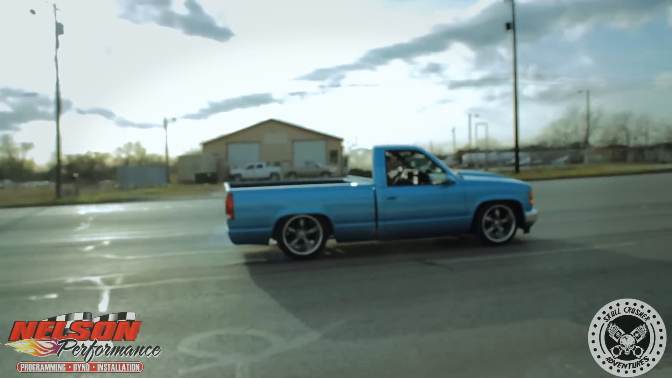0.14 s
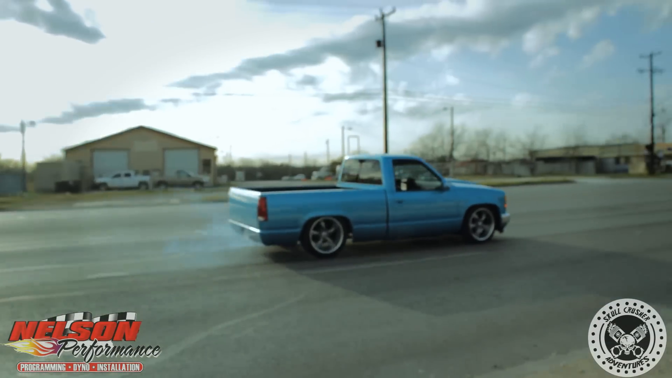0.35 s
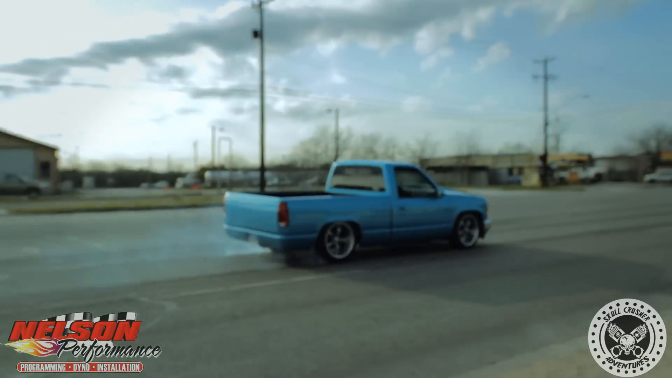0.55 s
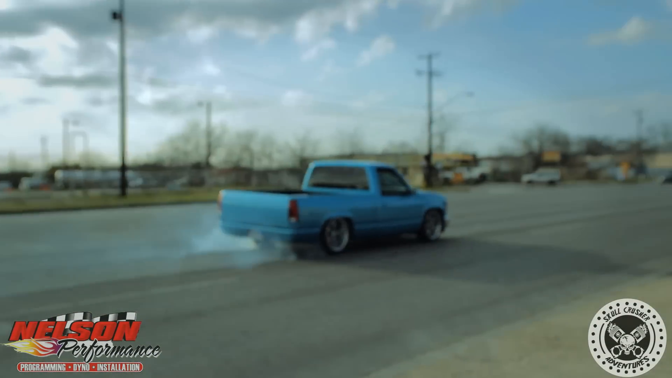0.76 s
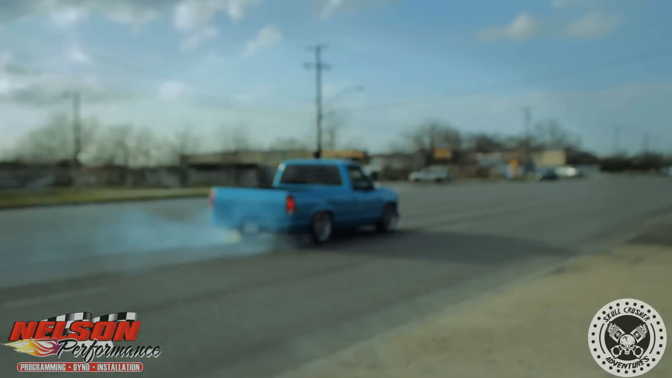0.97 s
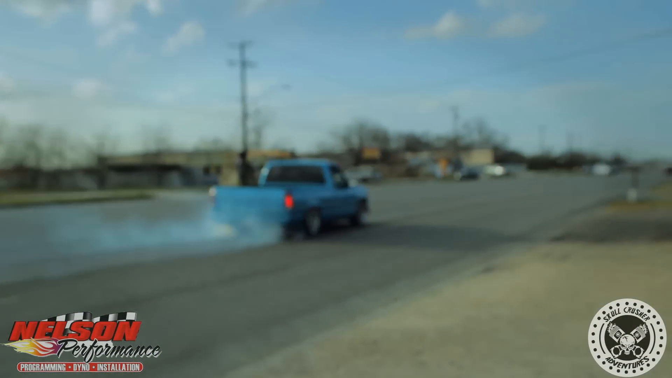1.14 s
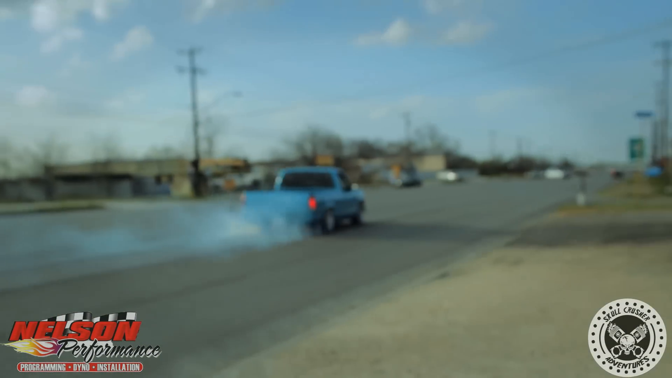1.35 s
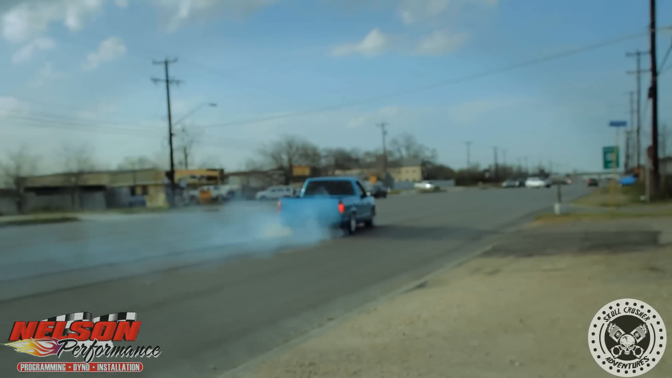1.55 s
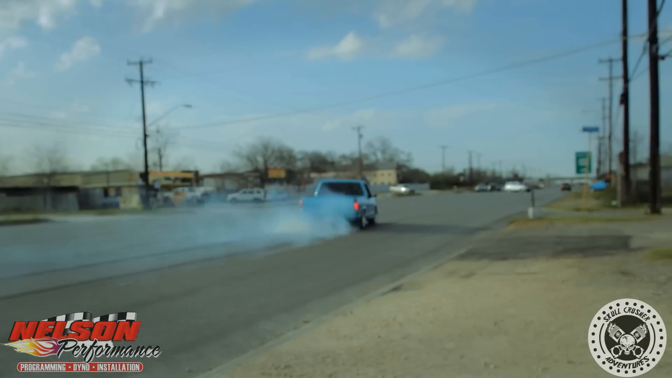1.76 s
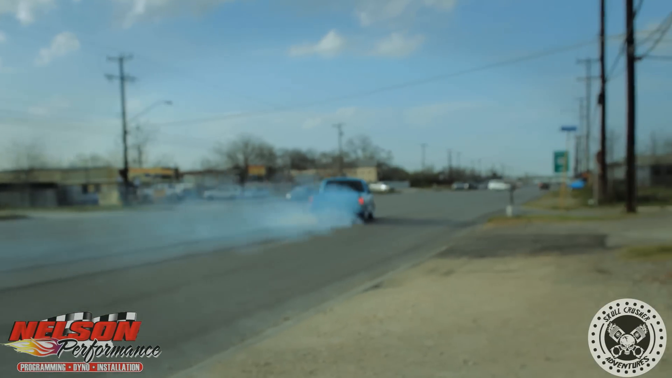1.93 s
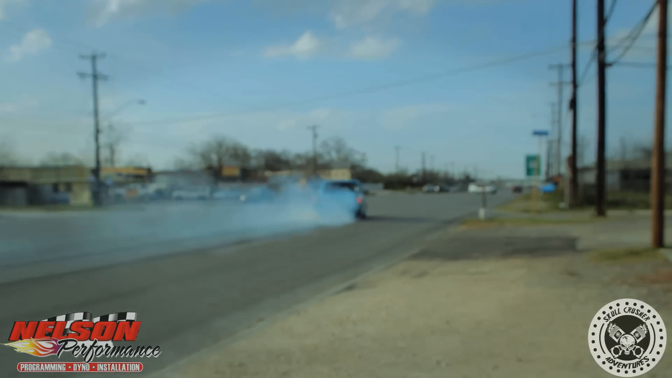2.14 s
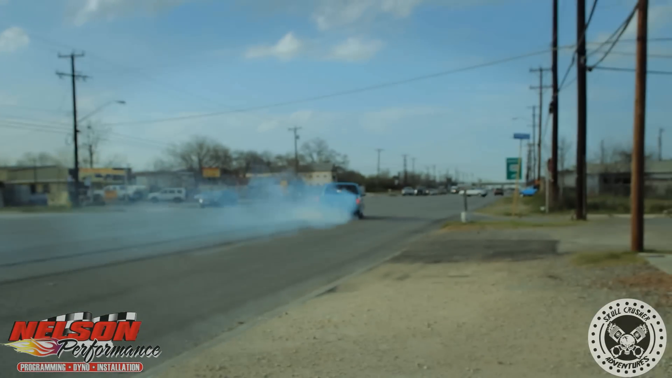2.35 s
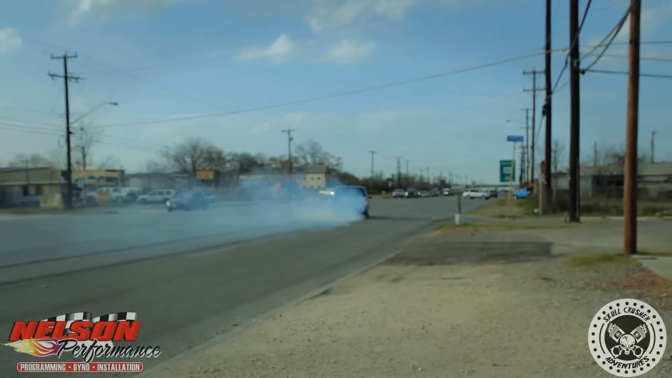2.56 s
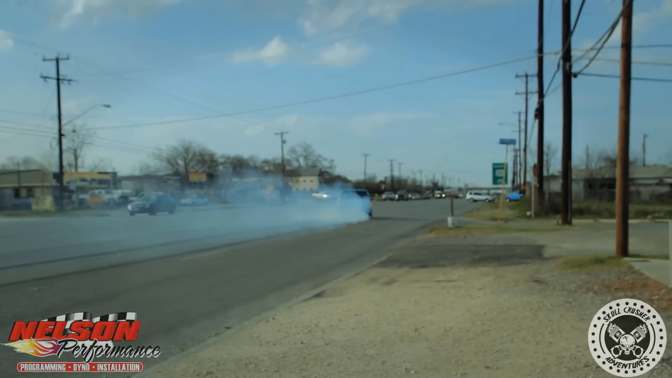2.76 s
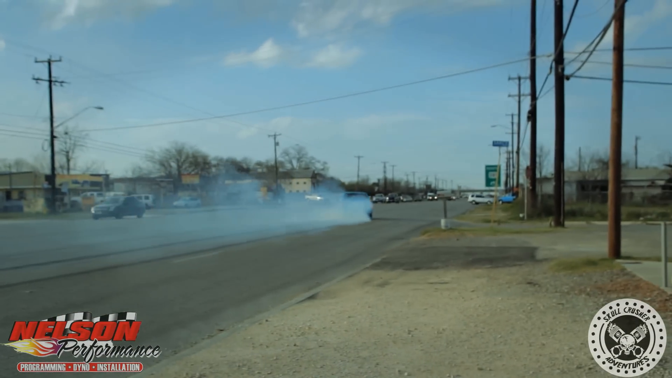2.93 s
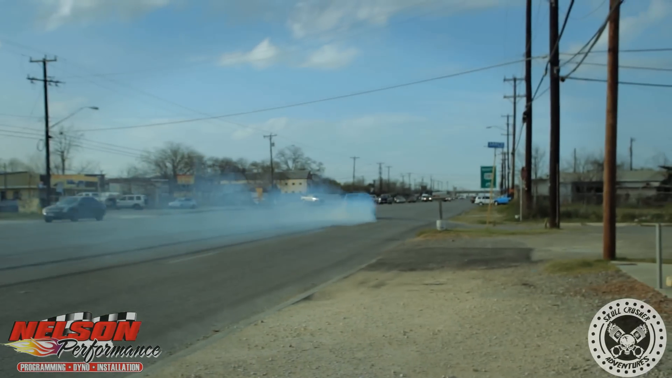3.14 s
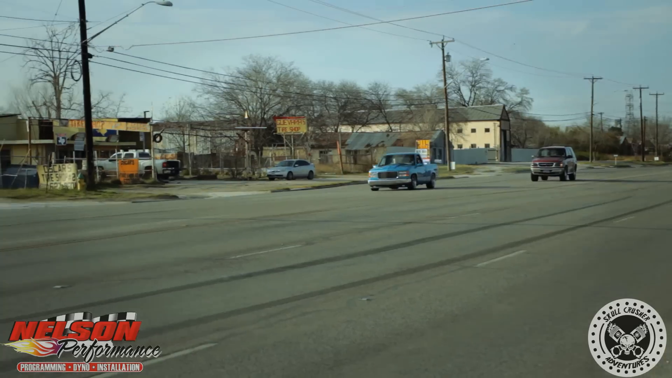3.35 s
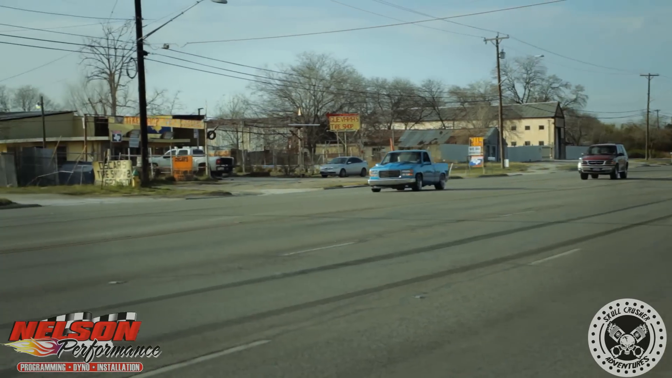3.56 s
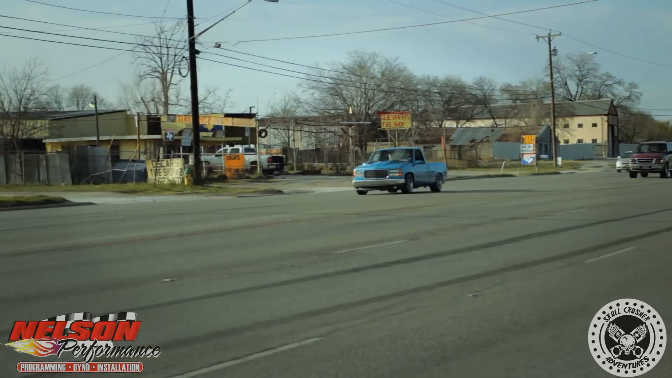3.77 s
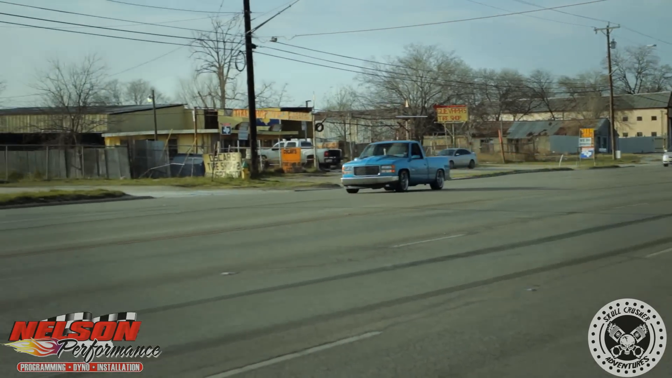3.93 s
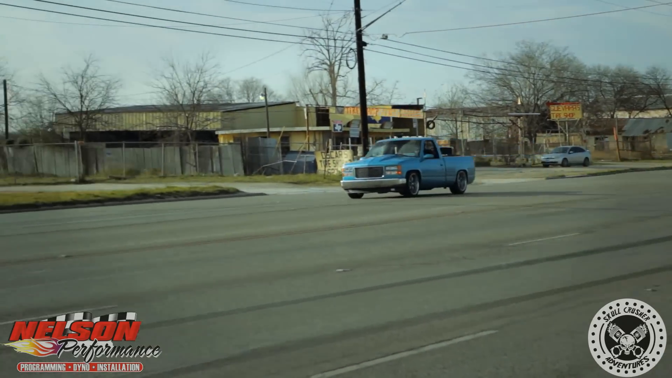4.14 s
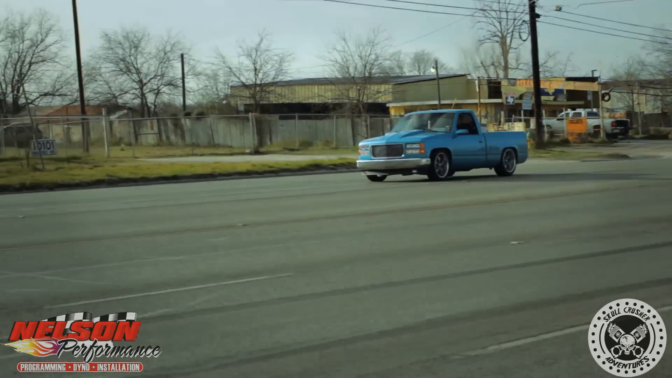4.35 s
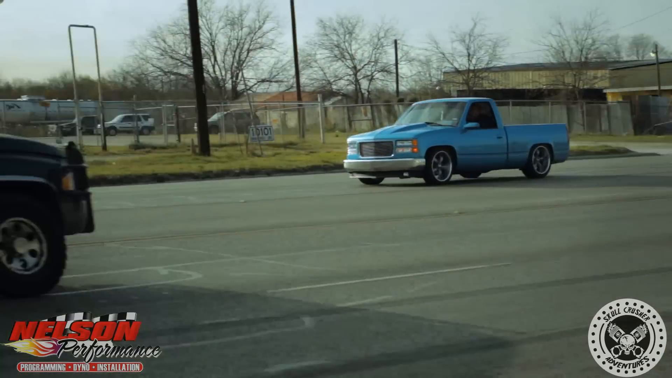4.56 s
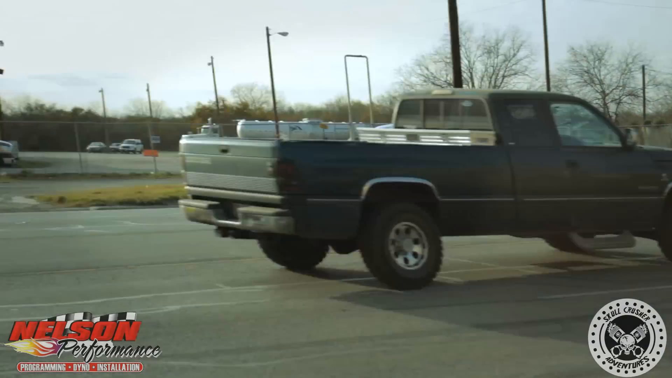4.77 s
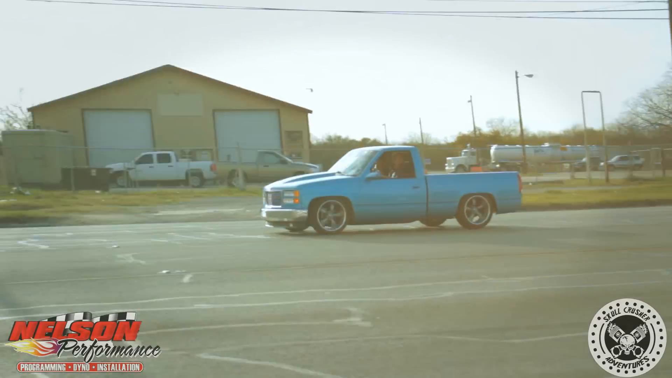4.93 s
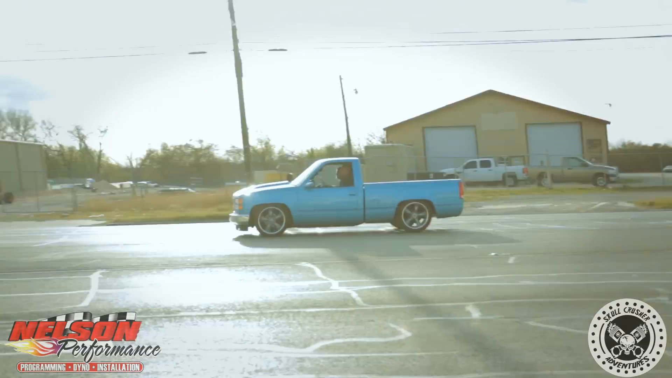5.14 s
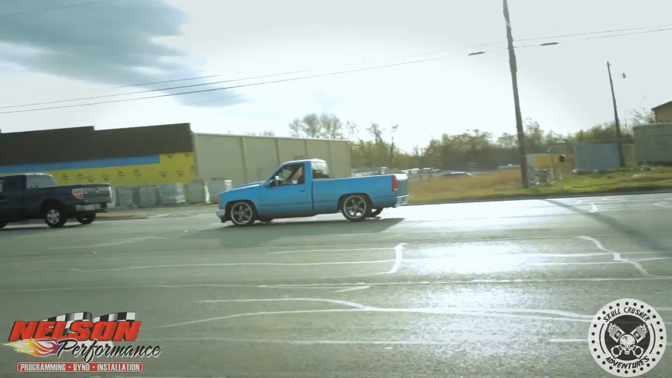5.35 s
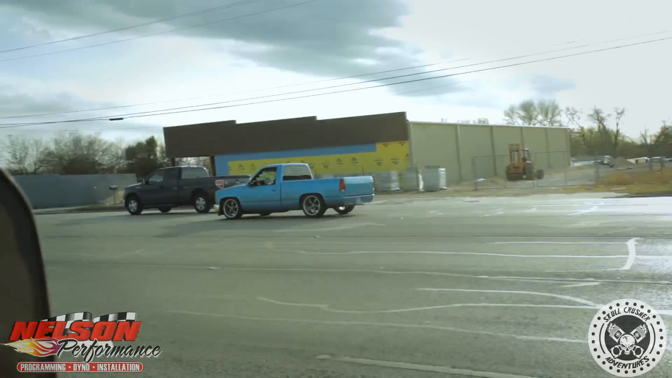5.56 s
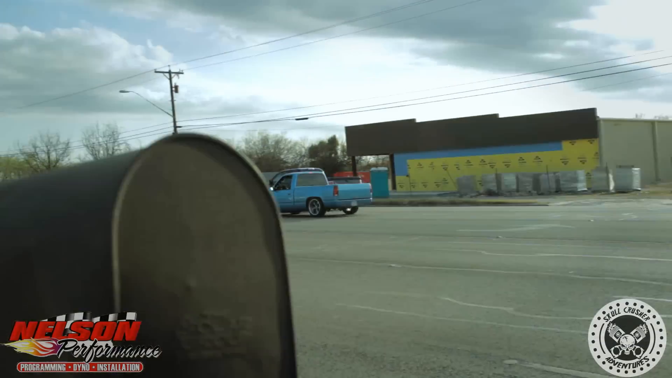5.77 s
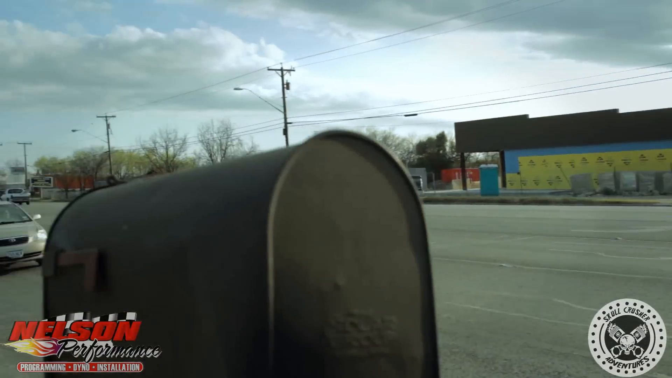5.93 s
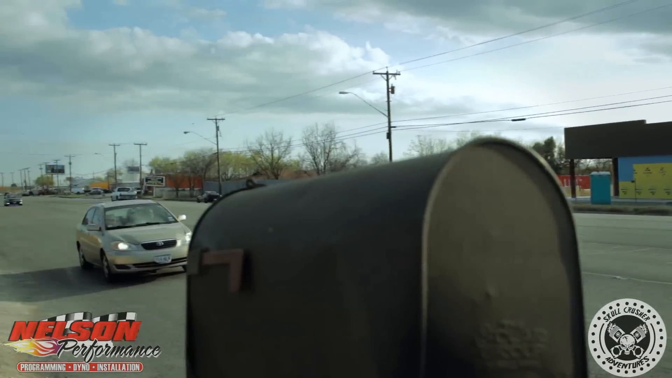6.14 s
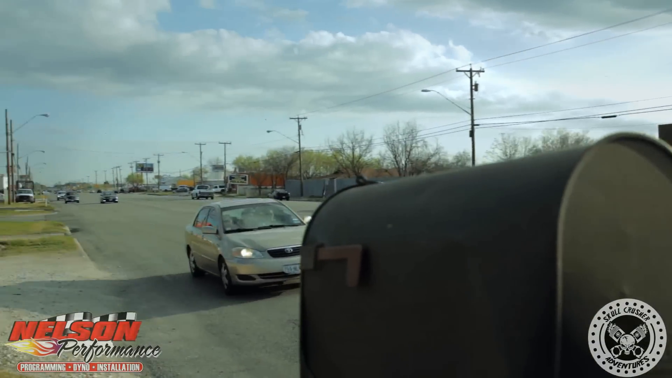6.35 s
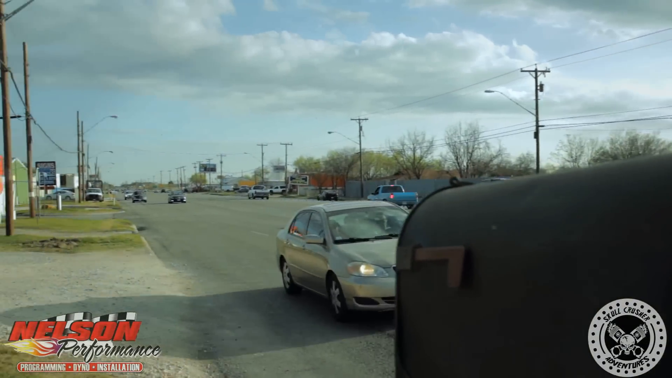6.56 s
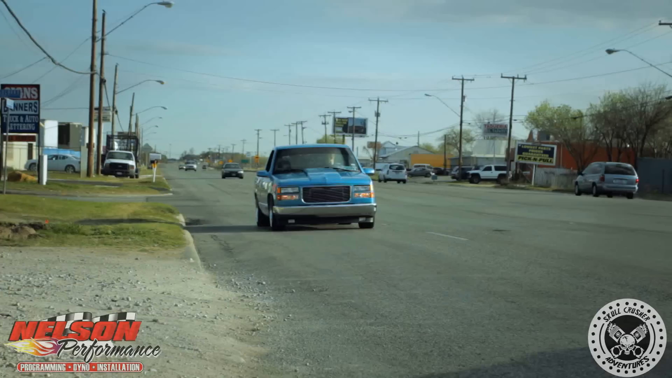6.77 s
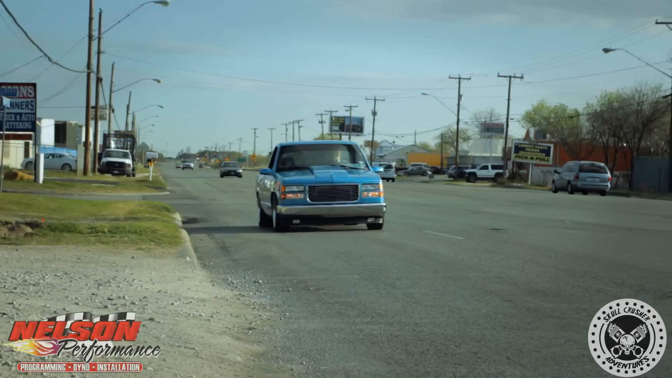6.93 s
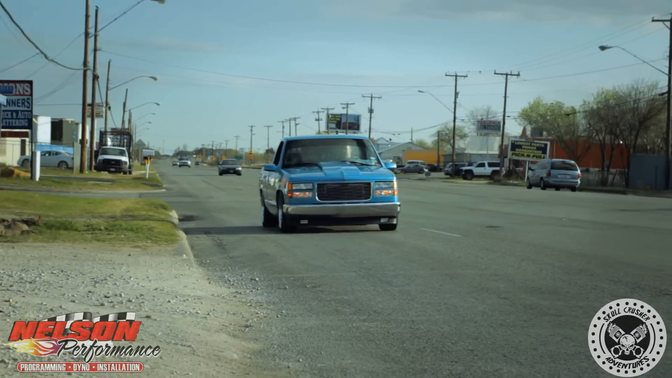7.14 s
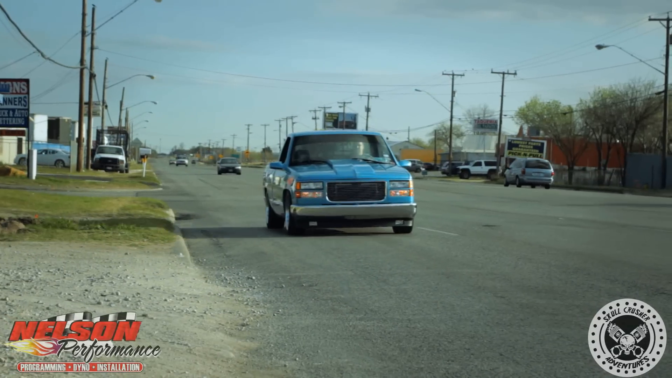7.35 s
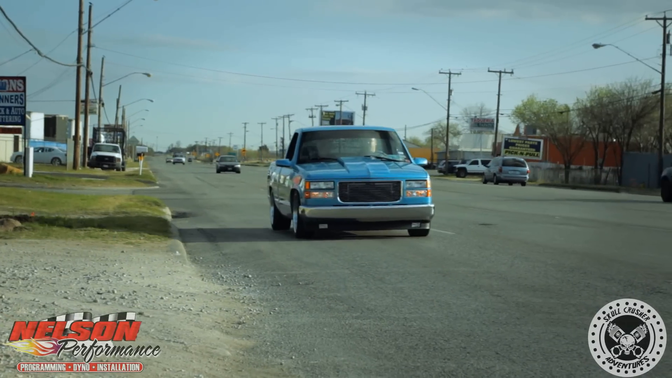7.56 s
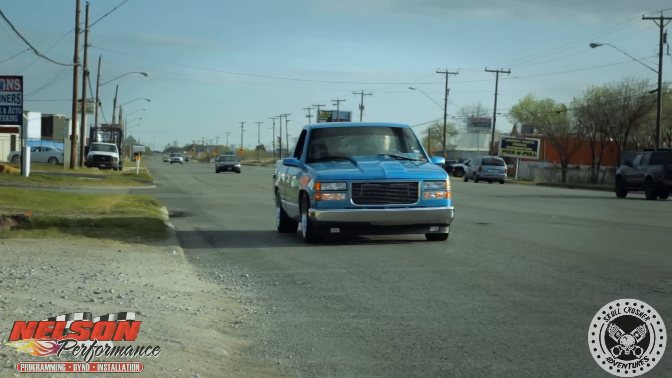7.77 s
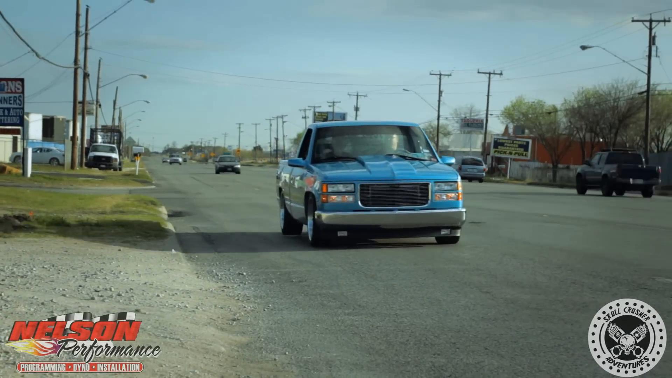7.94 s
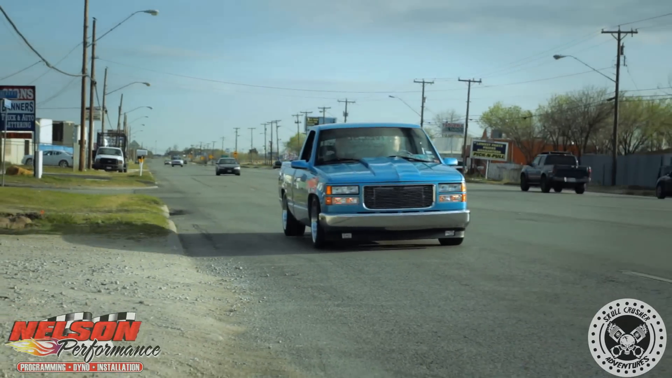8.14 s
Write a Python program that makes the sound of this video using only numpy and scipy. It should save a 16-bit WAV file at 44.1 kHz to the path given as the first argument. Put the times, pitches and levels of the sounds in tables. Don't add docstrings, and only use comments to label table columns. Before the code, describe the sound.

Loud V8 truck burnout receding down a street, then a rising drive-by with turbo whistle and exhaust pops, ending in a rough, blipping idle.

```python
import sys
import numpy as np
from scipy import signal
from scipy.fft import rfft, irfft, next_fast_len
from scipy.io import wavfile
from scipy.ndimage import uniform_filter1d, map_coordinates

SR = 44100
rng = np.random.default_rng(int(sys.argv[2]) if len(sys.argv) > 2 else 0)


def voltage_ratio(level):
    return 10 ** (np.asarray(level, float) / 20)


def put_to_file(sound):
    columns = np.atleast_2d(sound).T
    safe = np.clip(columns, -1, 1)
    whole_steps = np.round(safe * 32767)
    wavfile.write(sys.argv[1], SR, whole_steps.astype(np.int16))


N = 366030


def unit(x):
    return x / np.sqrt(np.mean(x ** 2) + 1e-20)


def curves(rows):
    s, *cols = np.transpose(rows)
    first, last = max(round(s[0] * SR), 0), min(round(s[-1] * SR), N)
    time_s = np.arange(first, last) / SR
    return slice(first, last), [np.interp(time_s, s, col) for col in cols]


def wobble(size, rate_hz):
    knots = rng.standard_normal(int(N * rate_hz / SR) + 4)
    return map_coordinates(knots, [np.arange(size) * rate_hz / SR])


def fade(size, ramp_s):
    k = np.arange(size)
    return np.clip(np.minimum(k, size - k) / (ramp_s * SR), 0, 1)


def band(x, spectrum, lo_hz, hi_hz):
    m = next_fast_len(len(x) + 8192)
    hz = np.fft.rfftfreq(m, 1 / SR) + 1
    point_hz, point_db = np.transpose(spectrum)
    colour = voltage_ratio(np.interp(np.log(hz), np.log(point_hz), point_db))
    edges = (1 + (lo_hz / hz) ** 10) * (1 + (hz / hi_hz) ** 10)
    return unit(irfft(rfft(x, m) * colour / np.sqrt(edges), m)[:len(x)])


def orders(rows, strong, turn, weak, later, flutter_db):
    span, (hz, level_db) = curves(rows)
    size = len(hz)
    turns = np.cumsum(hz) / SR
    away = np.clip(np.linspace(-.4, 1.6, size), 0, 1)
    done, marks = np.linspace(0, 1, size), [0, *np.sort(turn)]

    def tone(k):
        jitter = .0009 * k * (k + 6) * wobble(size, 16)
        return np.sqrt(2) * np.sin(2 * np.pi * (k * turns + rng.random()) + jitter)

    x = np.zeros(size)
    for k, *db in strong:
        x += voltage_ratio(np.interp(done, marks, db) + flutter_db * wobble(size, 21.05)) * tone(k)
    strong_orders = [row[0] for row in strong]
    for (k, db), (_, later_db) in zip(weak, later):
        if k in strong_orders:
            continue
        echo_db = 2.8 * wobble(size, 8) - 6
        x += voltage_ratio(db + away * (later_db - db) + echo_db) * tone(k)
    return span, voltage_ratio(level_db) * x * fade(size, 0.0014), turns


# time in seconds, four-stroke cycle rate in Hz, tone level in dB.
FIRST_GEAR = [(0.0, 48.1, -15.5), (0.11, 51.33, -14), (0.246, 53.4, -6), (0.268, 53.5, -8),
              (0.291, 53.5, -27)]
WHEELSPIN = [(0.425, 44.4, -16), (0.445, 44.9, -12), (0.55, 44.03, -12.5), (0.639, 41.37, -12.5),
             (0.87, 43.5, -12.5), (1.2, 46.37, -13.5), (1.59, 48.76, -18.5), (1.67, 48.05, -19)]
TYRES_GRIP = [(1.79, 44.64, -18), (1.95, 41.4, -21), (2.15, 40.55, -22.5), (3.0, 38.86, -29.5),
              (3.14, 38.34, -29.5), (3.189, 36.4, -32), (3.24, 30.95, -33), (3.3, 34.4, -38),
              (3.37, 37.2, -41)]
LOADED_PASS = [(3.37, 37.1, -47), (3.42, 39, -40), (3.47, 35.5, -40), (3.56, 37.14, -31),
               (3.814, 44.06, -30), (4.146, 45.82, -27), (4.532, 47.1, -21), (4.74, 47.93, -17.5),
               (4.96, 47.5, -24), (5.001, 45.5, -28)]
COAST_OFF = [(5.03, 36, -26.5), (5.252, 34, -27), (5.37, 33.16, -25.5), (5.607, 32.2, -26),
             (5.77, 31.5, -30), (5.83, 31.96, -30), (5.93, 29.6, -34.5), (6.082, 27.6, -32.5),
             (6.702, 20.9, -37.5), (6.885, 20.1, -43)]
# time in seconds, shaft rate in Hz, tone level in dB.
IDLE = [(6.895, 28.5, -40), (7.66, 27.4, -33.5), (7.94, 35.4, -31), (8.01, 37.7, -27.5), (8.075, 36.7, -36),
        (8.13, 37.3, -26.5), (8.195, 36.4, -30), (8.25, 39.7, -23.5), (8.3, 41.5, -24)]
# order, dB re tone level at the start, then dB at each turning point.
MAIN_ORDERS = [
    [(3, -12, -6.5, -14.5), (5, -34, -5, -8.5), (6, -13.5, -7, -5), (8, -3, -0.5, -10.5), (9, -1, -32, -11),
     (10, -9, -25, -25), (18, -4, -16, -31), (22, -16, -24, -12)],
    [(3, -17, -11, -11, -9.5, -12.5, -8), (5, -3, -2.5, 0.5, 0.5, -1, 0), (6, -23, -16, -15, -9, -15, -17),
     (8, -12, -6, -7.5, -12, -12, -8), (9, -22, -8.5, -13.5, -9, -14.5, -14),
     (19, -18, -23, -30, -30, -15, -15), (21, -25, -29, -9, -14, -30, -29),
     (22, -26, -27, -14, -14.5, -14.5, -21)],
    [(3, 2, -5.5, -18, -16, -9, -14, -14, -15), (5, -3, -13.5, -1.5, -2.5, -3, -0.5, -7, -11),
     (6, -14, -9, -27, -29, -9, -6, -9, -9), (8, -17, -7, -6.5, -11.5, -12, -15, -6, 1.5),
     (10, -20, -14, -14, -10, -18, -25, -27, -20), (11, -20, -19, -13, -13, -22, -19, -24, -20),
     (12, -17, -12, -25, -15, -12, -24, -22, -20)],
]
SPIN_ORDERS = [(2, -15, -30, -24, -26, -17, -16, -14, -26, -21, -22, -27, -20),
               (3, -4.5, -5.5, -6, -6.5, -7, -6, -5.5, -7.5, -6, -3, -8, -6.5),
               (5, -3.5, -7.5, -3, -6.5, -3.5, -4.5, -3, -6.5, -8.5, -8, -5, -1),
               (6, -13, -17, -15, -22, -19, -20, -20, -17, -16, -16, -16, -20),
               (8, -8, -7.5, -13, -7, -7.5, -27, -13, -11.5, -5.5, -2, -1.5, -20),
               (9, -6.5, -9.5, -4.5, -10.5, -17.5, -17, -15.5, -11, -24, -12, -4, -18),
               (10, -11, -8.5, -20, -15, -31, -24, -26, -24, -19, -17.5, -16, -20),
               (12, -20, -20.5, -11.5, -13.5, -17, -24, -28, -19, -19, -16.5, -15.5, -24),
               (19, -22, -15, -24, -21, -19, -14, -18, -22, -24, -23, -23, -32),
               (22, -17, -11.5, -20, -9.5, -27, -25, -20, -15, -11, -8.5, -16, -28)]
# order, dB at the start, dB at each of two turning points.
IDLE_ORDERS = [(2, -4, -13, -2.5), (3, -0.5, -6.5, -11), (4, -3, -5, -6.5), (6, -9, -7, -14.5),
               (8, -8.5, -15.5, -28)]
# order, dB re tone level.
MINOR_ORDERS = [
    [(1, -31), (2, -21.5), (4, -15.5), (7, -16.5), (10, -18.5), (11, -19.5), (12, -9.5), (13, -26),
     (14, -15), (15, -17), (16, -29), (17, -17.5), (18, -21), (19, -13), (20, -18)],
    [(1, -23), (2, -16), (4, -11), (7, -33), (10, -21), (11, -12.5), (12, -19), (13, -16), (14, -14),
     (15, -24.5), (16, -39), (17, -27), (18, -14), (19, -13.5), (20, -24)],
    [(1, -43), (2, -12.5), (4, -11), (7, -38), (10, -20), (11, -23), (12, -21), (13, -41), (14, -23),
     (15, -14), (16, -13), (17, -45), (18, -14), (19, -12.5), (20, -31), (21, -25)],
    [(1, -41), (2, -16), (4, -8.5), (7, -28), (10, -14), (11, -9), (12, -22)],
]
TURNING_POINTS = [
    (0.48, 0.86),
    (.04, .085, .15, .27, .32, .43, .6, .69, .81, .91, .95),
    (.3, .48, .64, .78, .92),
    (.05, .22, .4, .5, .63, .76, .88),
    (0.58, 0.81),
]


def exhaust():
    x, cycles = np.zeros(N), np.full(N, 40 / SR)
    spin, recede, load, coast = MINOR_ORDERS

    def far(weak):
        return [(k, db - 3) for k, db in weak]

    pulls = [
        (FIRST_GEAR, MAIN_ORDERS[0], TURNING_POINTS[0], spin, spin),
        (WHEELSPIN + TYRES_GRIP, SPIN_ORDERS, TURNING_POINTS[1], spin, recede),
        (LOADED_PASS, MAIN_ORDERS[1], TURNING_POINTS[2], far(load), load),
        (COAST_OFF, MAIN_ORDERS[2], TURNING_POINTS[3], coast, far(coast))]
    for pull in pulls:
        span, x[span], turns = orders(*pull, flutter_db=1.2)
        cycles[span] = np.gradient(turns)
    lope = [(1.5, -11), (2.5, -9), (3.5, -11), (4.5, -11), (5, -10), (7, -17)]
    span, x[span], turns = orders(IDLE, IDLE_ORDERS, TURNING_POINTS[-1], lope, lope, flutter_db=2.5)
    cycles[span] = np.gradient(turns) / 2
    return x, 8 * np.cumsum(cycles)


# level in dB of one firing at the tail pipe, in firing order.
CYLINDERS_DB = [1, 0, -2.5, -2.5, -5.5, -5.5, -4.5, -2]


def gate(firings, scatter_db, decay):
    k = firings.astype(int)
    phase = firings - k
    scatter = scatter_db * rng.standard_normal(N // 50)[k]
    size = voltage_ratio(np.array(CYLINDERS_DB)[k % len(CYLINDERS_DB)] + scatter)
    return size * np.exp(-decay * phase) * np.minimum(phase / 0.024, 1)


# frequency in Hz, density in dB per Hz.
LAUNCH_COLOUR = [(260, -27), (450, -16), (522, -22), (723, -2.5), (1180, -2.5), (1920, -9), (3040, -2),
                 (4880, -12.5), (15500, -27)]
BURNOUT_COLOUR = [(260, -35), (450, -9), (514, -16), (587, -13), (929, -4), (1730, -5), (2150, -7.5),
                  (2600, -3), (3370, -2), (3750, -6.5), (4100, -11.5), (11200, -29.5), (15500, -40)]
COAST_COLOUR = [(260, -38), (450, -7.5), (733, -0.5), (1450, -3.5), (1860, -9), (3180, -7.5), (3700, -11.5),
                (4210, -18.5), (8070, -33), (15500, -51)]
PASS_COLOUR = [(260, -39), (450, -9), (755, -7.5), (972, -3.5), (1630, -8.5), (3180, -7.5), (5660, -26.5),
               (6860, -29), (15500, -53)]
STREET_COLOUR = [(260, -31), (450, -4), (642, 0), (744, -0.5), (986, 0.5), (1350, -2.5), (1890, -7.5),
                 (7060, -34), (15500, -61)]
RUMBLE_COLOUR = [(25, -22), (55, -16), (90, -4.5), (180, -2), (300, -4.5), (500, -6)]
# edge in Hz between rumble, roar, rasp and hiss.
EDGES_HZ = [20, 460, 2100, 4200, 15700]
# time in seconds, strength in dB, treble loss (distance, shut throttle) in dB.
LEAVING = [
    [(0.0, -13.5, 8), (0.256, -12, 7.5), (0.285, -16.5, 5)],
    [(0.285, -17.5, 8.5), (0.347, -25, 7), (0.39, -22, 14), (0.44, -23, 9)],
    [(0.44, -19.5, 2.5), (0.47, -16, 5.5), (0.78, -16, 6), (1.28, -18, 8.5), (1.4, -17.5, 5.5),
     (1.48, -19.5, 12), (1.84, -23.5, 11.5), (1.95, -25.5, 11), (2.65, -30, 14), (3.1, -34, 14),
     (3.15, -37, 17)],
    [(3.15, -36.5, 20), (3.3, -37, 20), (3.38, -38.5, 27)],
    [(3.38, -41, 23), (3.598, -42.5, 31), (3.61, -40, 20)],
]
PASSING = [
    [(3.61, -39, 24), (3.74, -36, 19.3), (4.38, -28.5, 8.3), (4.778, -23.5, 6.6), (4.925, -27, 8.2),
     (4.95, -28, 4.4), (4.98, -30, 6.2), (5.0, -32, 16)],
    [(5.0, -27.5, 19), (5.035, -27.5, 17), (5.22, -29, 21), (5.45, -33.5, 19), (5.55, -32, 16),
     (5.65, -33, 21), (5.82, -34, 22), (5.968, -37, 24), (6.064, -38, 24), (6.27, -38.5, 37),
     (6.875, -39.5, 32), (6.896, -46, 34)],
    [(6.896, -34, 19.5), (7.0, -32, 21.6), (7.142, -31.5, 24), (7.3, -34.5, 26.6), (7.522, -35, 33.4),
     (7.9, -35.5, 29), (8.28, -36, 29.4), (8.3, -38, 20)],
]


def flow(firings):
    x = np.zeros(N)
    puffs = unit(gate(firings, scatter_db=2.5, decay=1.1))
    gusts = wobble(N, 11) + 0.86 * wobble(N, 35)
    colours = [LAUNCH_COLOUR, LAUNCH_COLOUR, BURNOUT_COLOUR, BURNOUT_COLOUR, COAST_COLOUR,
               PASS_COLOUR, COAST_COLOUR, STREET_COLOUR]
    loads = [.8, .4, .85, .6, .3, .75, .4, .2]
    rumbles_db = [-9.5, 7, -12.5, -2, 6, -5, -2.5, -3.5]
    chops = [.15, .2, .42, .52]
    high = signal.butter(2, 9000, "high", fs=SR, output="sos")
    for rows, colour, load, rumble_db in zip([*LEAVING, *PASSING], colours, loads, rumbles_db):
        span, (roar_db, loss_db) = curves(rows)
        size = len(roar_db)
        rasp_db = 3 - 0.49 * loss_db
        levels_db = [roar_db + rumble_db, roar_db, roar_db + rasp_db, roar_db - loss_db]
        top_db = .6 * (loss_db.mean() - loss_db)
        for db, lo_hz, hi_hz, chop in zip(levels_db, EDGES_HZ, EDGES_HZ[1:], chops):
            share = np.clip(chop * load, 0, 1)
            chopped = 1 - share + share * puffs[span]
            gas = rng.standard_normal(size) * chopped * voltage_ratio(1.6 * share * gusts[span])
            layer = band(gas, RUMBLE_COLOUR if lo_hz < 100 else colour, lo_hz, hi_hz)
            top = signal.sosfiltfilt(high, layer)
            layer = layer + (voltage_ratio(top_db) - 1) * top
            x[span] += voltage_ratio(db) * layer * np.sqrt(fade(size, 0.0011))
    return x


def patchy(x, patchy_db):
    z = signal.stft(x, nperseg=1024)[2]
    field = rng.standard_normal(z.shape)
    for axis in (0, 1):
        field = uniform_filter1d(field, size=5, axis=axis)
    y = signal.istft(z * voltage_ratio(patchy_db * unit(field)), nperseg=1024)[1][:N]
    return y * np.std(x) / np.std(y)


# start in seconds, peak in dB, thump in Hz, crack in dB.
GEAR_POPS = [(0.301, 4.5, 122, -11.5), (0.396, -2, 385, -7.5), (0.412, -5, 374, -16),
             (5.029, -14, 110.6, -17), (5.139, -12, 172, -13), (5.335, -19, 159, -10),
             (5.365, -20, 163, -8), (5.395, -23, 164, -10), (5.432, -19, 166, -10),
             (5.529, -29, 166.3, -11), (5.69, -25, 159.4, -12), (6.513, -34, 169.6, -17)]
# start in seconds, peak in dB, thump in Hz.
BURBLE = [(3.225, -22, 150), (3.295, -23, 165), (3.355, -23, 175), (3.41, -25, 190), (3.476, -23, 170)]
IDLE_LUMPS = [(7.959, -17, 72.7), (8, -19, 75.4), (8.033, -11.5, 164), (8.089, -12, 91.5),
              (8.139, -15, 180), (8.169, -12, 70.4), (8.218, -12, 75.4), (8.259, -16, 91.5)]


def pops():
    x, t = np.zeros(N + SR), np.arange(SR // 5) / SR
    soften = signal.windows.gaussian(M=9, std=1.3) / 3
    soft_pops = [(*row, -60) for row in IDLE_LUMPS + BURBLE]
    for s, db, hz, crack_db in [*GEAR_POPS, *soft_pops]:
        thump = np.sin(2 * np.pi * hz * t) * voltage_ratio(-60 * t / 0.051) * (1 - np.exp(-t / 0.0018))
        puff = np.convolve(rng.standard_normal(len(t)), soften, "same")
        puff *= voltage_ratio(crack_db + 3.5 - 60 * t / 0.12) * (1 - np.exp(-t / 0.008))
        cough = signal.lfilter(np.hanning(40) / 20, 1, rng.standard_normal(len(t)))
        cough *= voltage_ratio(crack_db / 4 + 7 - 60 * t / .09)
        x[round(s * SR):][:len(t)] += voltage_ratio(db - 3.5) * (thump + puff + cough)
    return x[:N]


def whine(rows, partials, wander, flutter_db):
    x = np.zeros(N)
    span, (hz, db) = curves(rows)
    size = len(hz)
    turns = np.cumsum(hz * (1 + wander * wobble(size, 160))) / SR
    tone = np.zeros(size)
    for k, level_db in partials:
        tone += voltage_ratio(level_db + flutter_db * wobble(size, 37.9)) * np.sin(2 * np.pi * k * turns)
    x[span] = voltage_ratio(db) * tone * fade(size, 0.0091)
    return x


# time in seconds, frequency in Hz, level in dB.
TURBO_WHISTLE = [
    [(.32, 6400, -46), (.36, 6000, -42), (.4, 6050, -40), (.44, 5900, -38)],
    [(3.4, 6600, -76), (3.5, 6850, -70), (3.62, 6500, -76), (4., 6850, -64), (4.35, 7050, -56),
     (4.6, 7050, -50), (4.85, 7100, -49), (4.97, 7100, -52)],
    [(5., 7200, -52), (5.04, 6700, -48), (5.1, 5950, -48), (5.18, 5480, -49), (5.33, 5320, -52),
     (5.45, 5280, -57), (5.55, 5250, -66)],
]
UPPER_WHISTLE = [
    (5.02, 13700, -63),
    (5.08, 12900, -61),
    (5.15, 12000, -62),
    (5.24, 11100, -68),
]


def turbo():
    blades = [(.985, -9), (1, -4.5), (1.015, -9)]
    x = sum(whine(rows, blades, wander=.009, flutter_db=4.5) for rows in TURBO_WHISTLE)
    return x + whine(UPPER_WHISTLE, blades, wander=.011, flutter_db=4.5)


# time in seconds, frequency in Hz, level in dB.
CATCH = [
    (.33, 120, -22),
    (.352, 140, -16),
    (.368, 205, -11),
    (.384, 265, -15),
    (.395, 300, -24),
]


def catch():
    return whine(CATCH, [(1, .1), (2, -10), (3, -12), (4, -14)], wander=.03, flutter_db=3)


# time in seconds, frequency in Hz, level in dB.
SQUEAL = [
    [(.385, 780, -24), (.397, 850, -15), (.41, 870, -22)],
    [(1.32, 900, -38), (1.43, 905, -28), (1.62, 912, -30), (1.75, 875, -28), (1.9, 850, -36)],
]
LIFT_CHIRP = [
    (4.93, 3025, -42),
    (4.95, 2997, -27),
    (4.975, 2970, -45),
]
# time in seconds, level in dB.
SCRUB = [
    (.9, -33),
    (1.5, -20.5),
    (2.1, -29.5),
    (2.7, -31),
    (3.3, -40),
]
# frequency in Hz, density in dB per Hz.
RUBBER_COLOUR = [(1200, -30), (1520, -3), (1800, -4.5), (2200, -15.5)]


def tyres():
    x = sum(whine(rows, [(1, 1.5)], wander=.015, flutter_db=3) for rows in SQUEAL)
    x += whine(LIFT_CHIRP, [(.93, -3), (1, 1.5), (1.08, -3)], wander=.05, flutter_db=3)
    span, (db,) = curves(SCRUB)
    size = len(db)
    tread = band(rng.standard_normal(size), RUBBER_COLOUR, 1200, 3750)
    x[span] += voltage_ratio(db + 0.81 * wobble(size, 24.8)) * tread * fade(size, 0.041)
    return x


# time in seconds, frequency in Hz, level in dB.
SECOND_TRUCK = [
    (4.25, 75.4, -53),
    (4.6, 75.36, -42),
    (5.0, 73.4, -39),
    (5.4, 70.3, -44),
]


def second_truck():
    return whine(SECOND_TRUCK, [(1, 3), (2, -6)], wander=.02, flutter_db=2)


# start in seconds, peak in dB.
GRIT_TICKS = [
    (6.1699, -47),
    (6.3244, -55),
    (6.6268, -48),
]


def grit():
    x, t = np.zeros(N), np.arange(SR // 5) / SR
    for s, db in GRIT_TICKS:
        tick = np.diff(rng.standard_normal(len(t) + 1))
        x[round(s * SR):][:len(t)] += voltage_ratio(db - 3 - 60 * t / .004) * tick
    return x


def scene():
    tones, firings = exhaust()
    gas = patchy(flow(firings), patchy_db=1.5)
    truck = tones + gas + pops() + turbo() + catch() + tyres()
    return (truck + second_truck() + grit())[None]


def top_cut(x):
    return signal.sosfilt(signal.butter(12, 15630, fs=SR, output="sos"), x)


# frequency in Hz, density in dB per Hz.
SELF_NOISE_COLOUR = [(300, 0), (4000, -8), (9000, -14.5), (15500, -14)]


def record(dry):
    x = signal.sosfilt(signal.butter(3, 50, "high", fs=SR, output="sos"), dry)
    last_take = np.arange(N) > 6.896 * SR
    hiss_db = -64 + 7.5 * last_take
    x = x + voltage_ratio(hiss_db) * band(rng.standard_normal(N), SELF_NOISE_COLOUR, 300, 15700)
    x = x / (1 + np.abs(x) ** 30) ** (1 / 30)
    return top_cut(x)


dry = scene()
out = record(dry)
put_to_file(out)
```